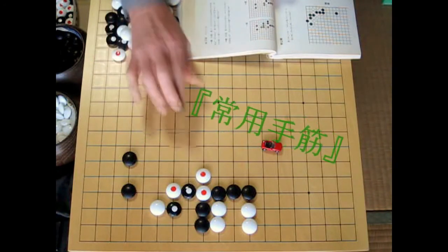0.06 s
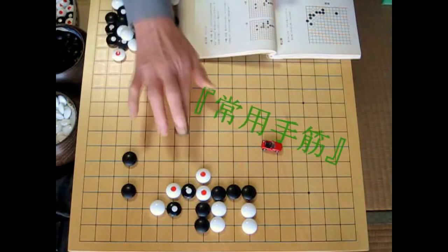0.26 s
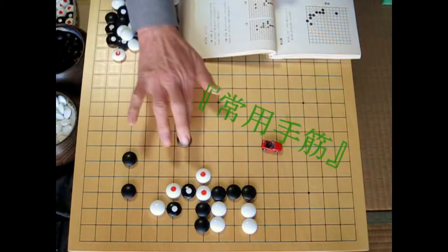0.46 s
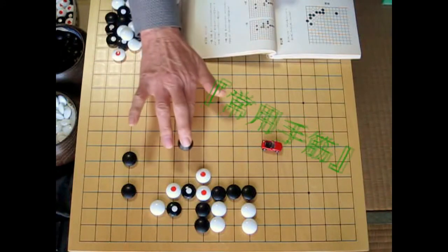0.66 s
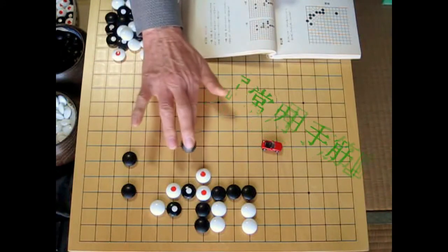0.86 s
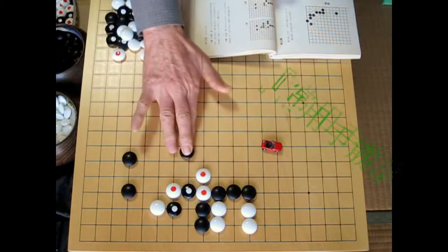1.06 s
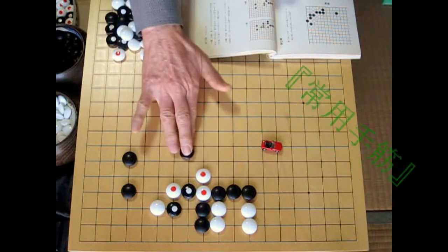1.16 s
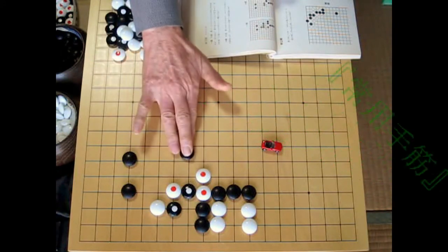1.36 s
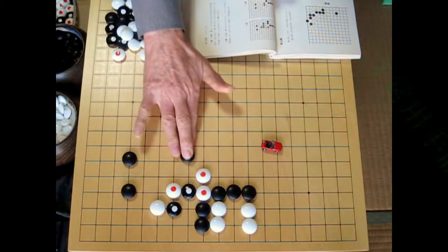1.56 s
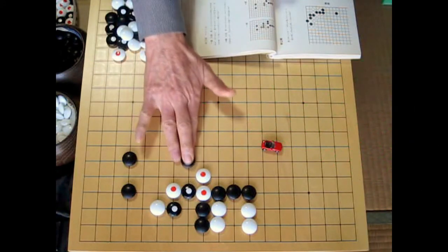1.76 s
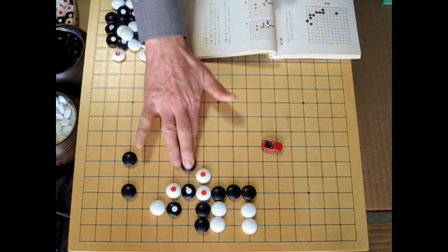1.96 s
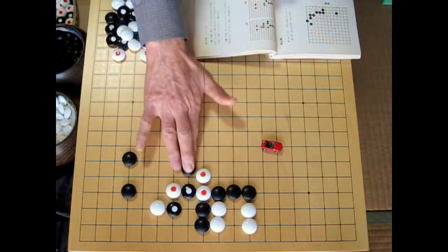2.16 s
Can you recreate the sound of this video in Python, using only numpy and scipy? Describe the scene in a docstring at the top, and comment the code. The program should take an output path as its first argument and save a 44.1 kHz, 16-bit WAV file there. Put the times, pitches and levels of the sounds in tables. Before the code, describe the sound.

One hard clack of a go stone on a wooden board comes after a quiet moment and rings briefly in a small room. Faint microphone hiss and a slight ticking whine lie underneath throughout.

```python
"""Stone snapped onto a wooden board

A go stone is snapped down on a thick board in a small quiet room: four contacts within 13 ms.
Each contact excites decaying modes (damped sines) and a crack (decaying noise); filtered noise is the room's
reply, made brighter by a short noise burst. Beneath lie steady noise and the pulsing, ticking whine of a
camera, whose gain control turns everything down at the clack and slowly back up; what still exceeds the
ceiling clips."""
import sys
import numpy as np
from scipy import signal
from scipy.fft import irfft
from scipy.io import wavfile
from scipy.ndimage import uniform_filter1d

SR = 44100
rng = np.random.default_rng(int(sys.argv[2]) if len(sys.argv) > 2 else 0)


def put_to_file(sound):
    """Save the sound as 16-bit audio at rate SR, in the file named by the first command-line argument."""
    columns = np.atleast_2d(sound).T  # one column per channel
    safe = np.clip(columns, -1, 1)
    whole_steps = np.round(safe * 32767)
    wavfile.write(sys.argv[1], SR, whole_steps.astype(np.int16))


N = 97857


def amp(db):
    """Decibel law: twenty decibels are a factor of ten in amplitude."""
    return 10 ** (np.asarray(db) / 20)


def unit_rms(x):
    """Root-mean-square normalization: scales a signal to rms 1."""
    return x / np.sqrt(np.mean(x ** 2) + 1e-20)


def read_column(points, hz, column=1):
    """Interpolation: joins one table column by straight lines over log frequency."""
    table = np.transpose(points)
    return np.interp(np.log(hz + 1), np.log(table[0] + 1), table[column])


def add(mix, start_s, sound):
    """Superposition: adds a sound to the mix from a given time."""
    part = mix[round(start_s * SR):][:len(sound)]
    part += sound[:len(part)]


def shaped_noise(spectrum, size):
    """Spectral synthesis: random phases under a given spectrum make noise of rms 1."""
    hz = np.fft.rfftfreq(size, 1 / SR)
    phases = np.exp(2j * np.pi * rng.random(len(hz)))
    return unit_rms(irfft(amp(read_column(spectrum, hz)) * phases, size))


def low_pass(x, hz):
    """Linear-phase filtering: a long windowed filter gives a steep band limit."""
    taps = signal.firwin(301, hz, window=("kaiser", 7), fs=SR)
    return signal.oaconvolve(x, taps[None], "same")


# contacts of the stone with the board: t/s, strength level/dB
CONTACTS = [(0.9666, 0.5), (0.9706, -7.5), (0.9729, -14.5), (0.9792, -31)]
# modes of board and stone: f/Hz, level/dB at a contact of strength 0 dB, t60/s
BOARD_MODES = [(194, -15, 0.2), (276, -3, 0.032), (556.4, 5, 0.051), (745.6, 4.6954, 0.026),
               (851.2, -4.5, 0.191), (997.06, -3.5, 0.164), (1226.1, 8, 0.048), (1293.3, 2.5, 0.077),
               (1604.4, 5.52, 0.134), (1850.6, 0, 0.16), (2113, 9.5, 0.048), (2237.9, 6.5, 0.04),
               (2379, -2.5, 0.078), (2534.6, 1, 0.051), (2872, 0.5, 0.084), (3058, 5, 0.062),
               (3266, 4, 0.009), (3701, -1.34, 0.05), (3846, 16, 0.006), (4147, -17, 0.073),
               (4620, 3, 0.017)]
# relative spectrum of the hard crack of stone on wood: f/Hz, level/dB per Hz
CRACK_SPECTRUM = [(40, -4), (200, 14), (600, -9.5), (1300, 10), (3000, 9), (4200, -0.5), (5600, -12),
                  (9000, -35.5)]
CRACK_DB, CRACK_DECAY_S = 15, 0.0022  # initial rms at a contact of strength 0 dB; time to fall to 1/e


def stone():
    """Modal excitation: every impact starts damped sines and a brief broadband crack."""
    t = np.arange(SR // 4) / SR
    clack = np.zeros(N)
    ring = sum(amp(db - 60 * t / t60) * np.sin(2 * np.pi * hz * t) for hz, db, t60 in BOARD_MODES)
    for start_s, strength_db in CONTACTS:
        # the short noise repeats, but has nearly died away by then
        grain = np.resize(shaped_noise(CRACK_SPECTRUM, size=512), len(t))
        crack = grain * np.exp(-t / CRACK_DECAY_S)
        add(clack, start_s, amp(strength_db) * (ring + amp(CRACK_DB) * crack))
    return clack


# relative spectrum of the noise burst that feeds the room: f/Hz, level/dB per Hz
BURST_SPECTRUM = [(40, -20), (140, -9.5), (195, 9.5), (320, -10.5), (800, -0.5), (1500, -0.5), (2500, -4),
                  (3100, 5), (3700, 4.5), (4600, -1), (5500, -3.5), (6400, 0.5), (8000, -20.5)]
BURST_DB, BURST_DECAY_S = 17, 0.0014  # initial rms; time to fall to 1/e


def room_burst():
    """Broadband excitation: a noise burst at the first contact makes the echo brighter and less tonal."""
    t = np.arange(2048) / SR
    out = np.zeros(N)
    burst = shaped_noise(BURST_SPECTRUM, size=len(t)) * np.exp(-t / BURST_DECAY_S)
    first_contact_s = CONTACTS[0][0]
    add(out, first_contact_s, amp(BURST_DB) * burst)
    return out


# reverberation of the room: f/Hz, relative echo level/dB, t60/s
ROOM_DECAY = [(100, -15, 0.39), (200, -9, .36), (350, -6, 0.31), (481, -3.5, .48), (1000, 0, .54),
              (1983.3, 1, 0.59), (2890, -2.5, .5), (4200, -5, .4), (6000, -13, 0.28), (8900, -11.5, .25)]
ROOM_DB = -16.5  # level of the whole response, its tail scaled to unit energy before the build-up
ROOM_DELAY_S, ROOM_BUILD_S = 0.006, 0.006


def room(x):
    """Diffuse reverberation: dense echoes build up, then die away, the middle range last."""
    hz, t, bands = signal.stft(rng.choice([-1., 1.], SR), SR, nperseg=256)
    level_db = read_column(ROOM_DECAY, hz)[:, None]
    t60 = read_column(ROOM_DECAY, hz, column=2)[:, None]
    bands = bands * amp(level_db - 60 * t / t60)
    tail = signal.istft(bands, SR, nperseg=256)[1][:SR]
    build = np.clip((np.arange(SR) / SR - ROOM_DELAY_S) / ROOM_BUILD_S, 0, 1)
    response = tail * build / np.linalg.norm(tail)
    return amp(ROOM_DB) * signal.fftconvolve(x, response)[:N]


# partials of the camera's whine: f/Hz, rms level/dB before it sags and rests
WHINE = [(990.5, -78), (7865, -80.5), (8909.5, -68)]
CYCLE_S, FIRST_TICK_S = 1 / 15, 0.0173
SAG_DB = -3  # slope of the sag, dB per whole cycle
REST_SHARE, REST_DB = 0.26, -7.5  # last part of each cycle, and its level
TICK_DB, TICK_HZ, TICK_DECAY_S = -40, 4574, 0.00012


def camera_whine():
    """Amplitude modulation: steady partials sag, rest and restart with a tick 15 times a second."""
    t = np.arange(N) / SR
    since_tick = (t - FIRST_TICK_S) % CYCLE_S
    cycle = since_tick / CYCLE_S
    level_db = np.where(cycle > 1 - REST_SHARE, REST_DB, SAG_DB * cycle)
    level = uniform_filter1d(amp(level_db), size=90)  # rounds the steps over 2 ms
    # the root of two turns rms into peak
    whine = sum(np.sqrt(2) * amp(db) * np.sin(2 * np.pi * (hz * t + rng.random())) for hz, db in WHINE)
    tick = amp(TICK_DB) * np.exp(-since_tick / TICK_DECAY_S) * np.sin(2 * np.pi * TICK_HZ * since_tick)
    return level * whine + tick


# relative spectrum of steady room noise and hiss: f/Hz, level/dB per Hz
FLOOR_SPECTRUM = [(12, -27.5), (20, 0.5), (173, -8), (234, -6), (334, -13), (379, -9.5), (477, -15.5),
                  (570, -11.5), (753, -18), (970, -15.5), (1160, -20), (1970, -21.5), (2420, -24),
                  (3720, -28), (4230, -25), (7390, -36), (8600, -44.5), (11200, -65), (18900, -120)]
FLOOR_DB, FLOOR_TOP_HZ = -51, 8950  # rms before the band limit; band limit


def noise_floor():
    """Stationary noise: a fixed spectrum with a steep upper limit."""
    return low_pass(amp(FLOOR_DB) * shaped_noise(FLOOR_SPECTRUM, size=N)[None], FLOOR_TOP_HZ)


def scene():
    """Superposition: the clack and its echo, the burst by way of the room only, whine and noise."""
    clack = stone()
    echo = room(clack)
    burst_echo = room(room_burst())
    return clack + echo + burst_echo + camera_whine() + noise_floor()


# gain control: threshold, power averaging time, time constant of the gain, recovery rate
LIMIT_DB, SENSE_S, ATTACK_S, RECOVER_DB_PER_S = -4, 0.004, 0.00034, 8
CEILING = 0.89  # clipping amplitude, full scale = 1
EDGE_HZ, LEAK_DB = 9550, -29.5  # band limit, and gain of what lies above it
TOP_HZ = 15500  # final band limit


def record(dry):
    """Compression and clipping: gain drops fast and creeps back; peaks clip, then the band is limited."""
    keep = np.exp(-1 / (SENSE_S * SR))
    power = signal.lfilter([1 - keep], [1, -keep], dry[0] ** 2)
    power_db = 10 * np.log10(power + 1e-12)
    # a running maximum that falls at the recovery rate
    creep_db = np.arange(N) / SR * RECOVER_DB_PER_S
    held_db = np.maximum.accumulate(power_db + creep_db) - creep_db
    over_db = np.maximum(held_db - LIMIT_DB, 0)
    lag = np.exp(-1 / (ATTACK_S * SR))
    ducked = dry * amp(-signal.lfilter([1 - lag], [1, -lag], over_db))
    clipped = np.clip(ducked, -CEILING, CEILING)
    narrow = low_pass(clipped, EDGE_HZ)
    leak = amp(LEAK_DB) * (clipped - narrow)
    return low_pass(narrow + leak, TOP_HZ)


dry = scene()
out = record(dry)
put_to_file(out)
```